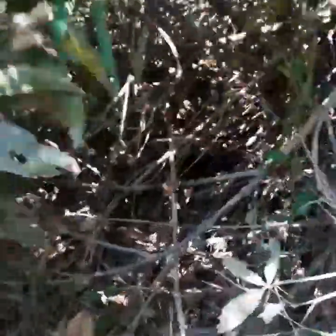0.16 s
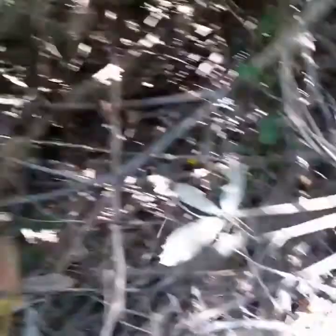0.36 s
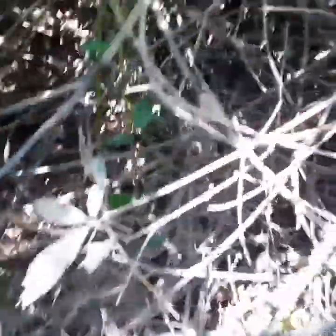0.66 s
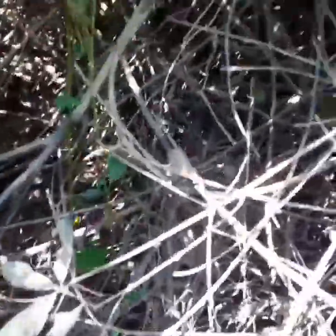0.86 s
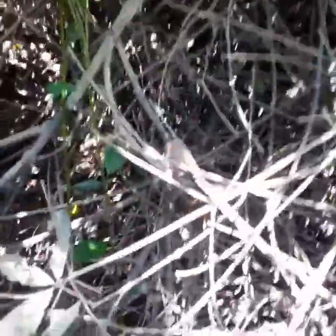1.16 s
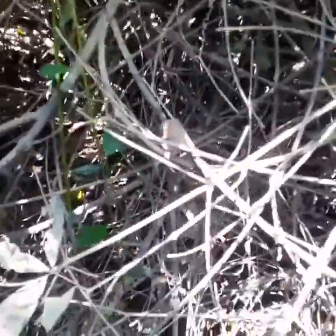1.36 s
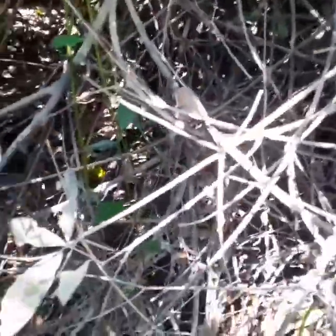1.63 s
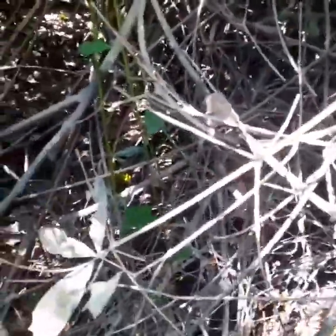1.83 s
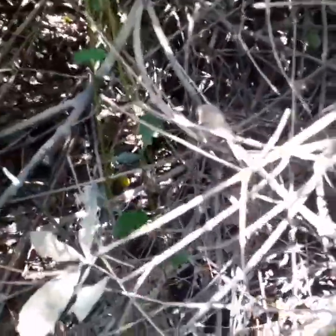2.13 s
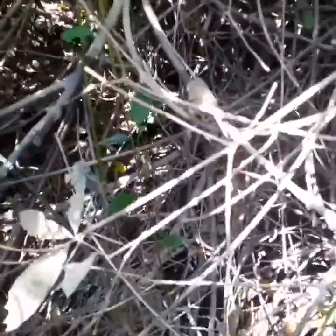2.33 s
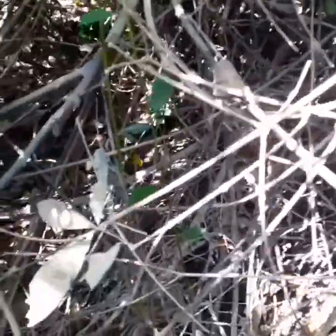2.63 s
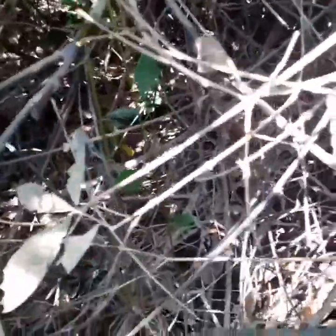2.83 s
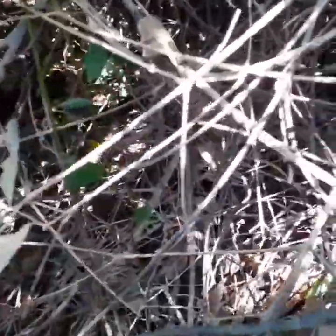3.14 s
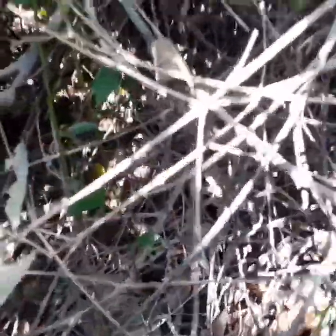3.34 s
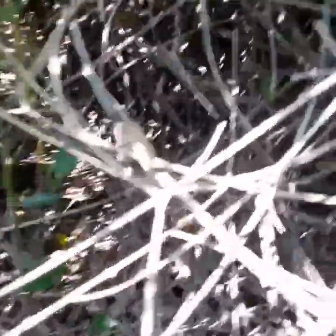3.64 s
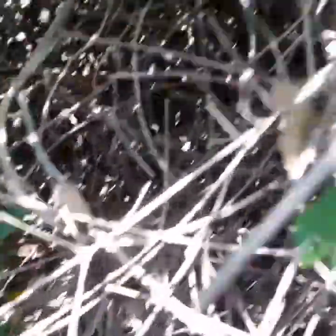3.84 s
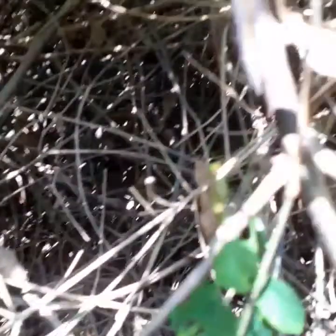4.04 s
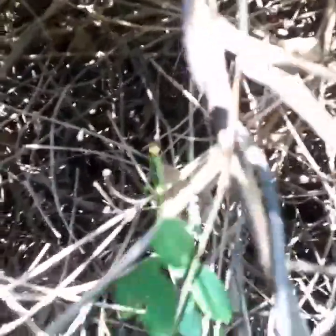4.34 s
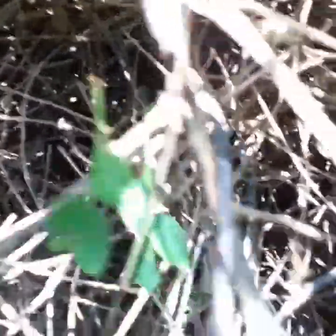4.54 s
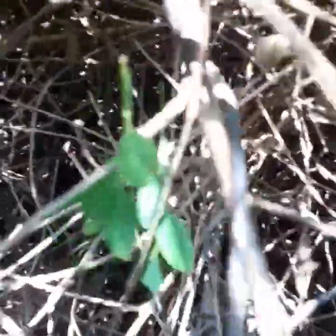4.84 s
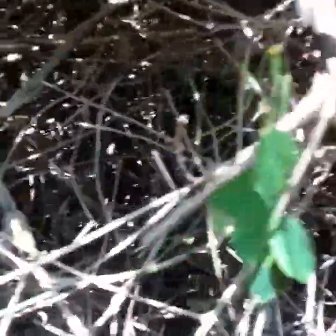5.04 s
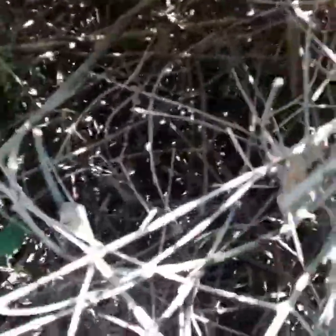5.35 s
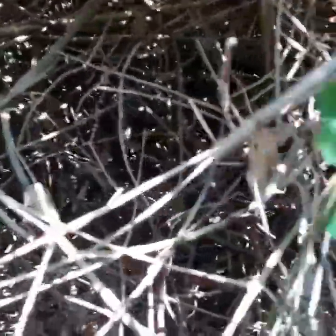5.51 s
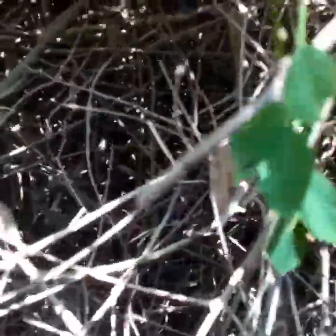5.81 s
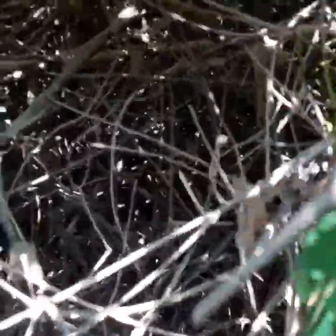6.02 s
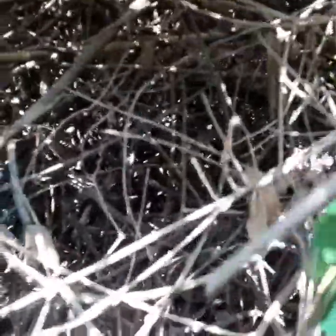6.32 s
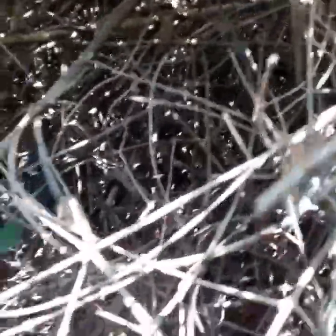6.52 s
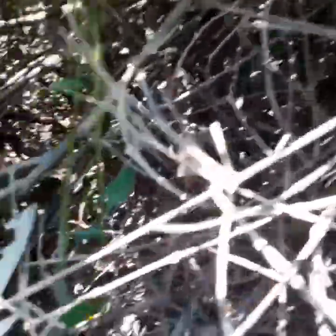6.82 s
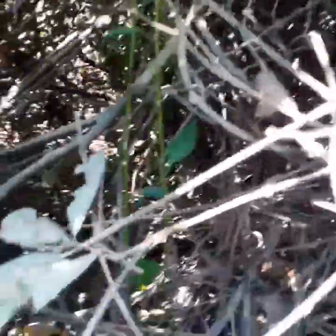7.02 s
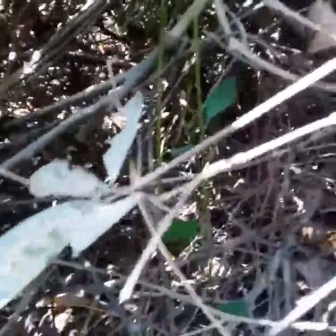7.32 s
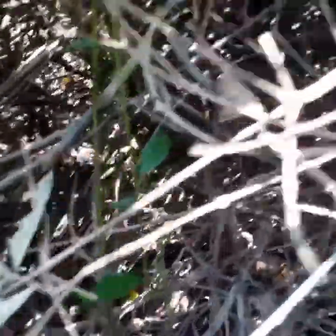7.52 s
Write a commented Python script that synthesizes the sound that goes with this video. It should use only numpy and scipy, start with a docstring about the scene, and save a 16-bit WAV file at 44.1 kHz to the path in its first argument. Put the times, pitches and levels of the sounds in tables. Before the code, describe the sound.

Close in a dry thicket, a hand pushes through dead leaves and twigs beside a handheld phone. Crisp, papery crackling starts at once with a bright snap near 0.1 s, swelling to a cluster of hard cracks and a brief rubbing creak at about 0.55 s, over a soft grip rumble. Snaps follow rapidly until 1.3 s, mostly toward the right. From 1.4 s the rustle drops to small ticks and light brushes, broken by a strong snap at 2.2 s and another at 3.2 s. A sharp crack at 3.5 s begins a second, fuller rustle lasting until about 4.5 s, with dull woody knocks near 4.25 and 4.7 s. Afterwards sparse, softer strokes come and go, with a knock and snap at 6.1 s and a weak last one near 7.6 s. Faint outdoor air stays behind; tiny distant bird notes touch 5.8, 6.6 and 7.2 s.

```python
"""Dead leaves crackle and twigs snap at once, close to a phone held by the twigs, as a hand pushes through.
Leaves are swarms of random clicks, snaps are short noise bursts with a ring, dragged stems are coloured noise.
Rubbed stems, and one snapping twig's ring, are noise through one resonance; a thicker branch knocks now and
then in damped sine modes. The thicket scatters every crack as decaying noise; the shifting grip rumbles softly.
Behind lie faint outdoor air, made of low noise with hiss, and a distant bird in gliding sine notes."""
import sys
import numpy as np
from scipy import signal
from scipy.fft import rfft, irfft
from scipy.io import wavfile

SR = 44100
rng = np.random.default_rng(int(sys.argv[2]) if len(sys.argv) > 2 else 0)


def store_wav(level_fs):
    """Save 16-bit WAV to argv[1]."""
    pcm = np.round(np.clip(np.atleast_2d(level_fs), -1, 1) * 32767)
    wavfile.write(sys.argv[1], SR, pcm.T.astype(np.int16))


N = 338351
TIME = np.arange(N) / SR

# faint outdoor air, spectrum before levelling: (f/Hz, density/dB per Hz)
AIR_SPECTRUM = [(20, -12), (40, -6.5), (60, 3.5), (95, -4), (160, 0), (260, -5.5), (420, -14),
                (1000, -25.5), (2200, -18.5), (4000, -28.5), (11000, -19)]
# distant bird notes, level before the echo mix and panning:
# (t/s, length/s, start f/Hz, end f/Hz, waver as a share of pitch, level/dB)
BIRD_NOTES = [(5.814, 0.017, 2500, 2300, .04, -53), (5.93, 0.041, 2620, 2310, 0.043, -49.5),
              (6.588, 0.049, 2860, 2080, 0.035, -54.5), (7.214, 0.19, 5380, 5800, 0.044, -57.5)]
# the phone shifts in the hand: (middle t/s, length/s, level/dB)
GRIP_SHIFTS = [(0.53, 0.38, -59.5), (2.275, 0.13, -64.5), (4.82, 0.22, -66), (7.297, 0.63, -75)]
# stems dragging over each other, spectrum before levelling: (f/Hz, density/dB per Hz)
STEM_SPECTRUM = [(40, -2), (100, -5), (250, -3.5), (370, -1.5), (480, 0), (750, -0.5), (1100, -0.5),
                 (1800, -5), (4000, -40.5)]
# a rubbed stem, or at 0.549 s the ring of a snapping twig, sounds one resonance;
# level before the fade in and out: (middle t/s, length/s, f/Hz, level/dB)
RESONANCES = [(0.474, 0.11, 365, -51), (0.515, 0.035, 700, -41), (0.55, 0.019, 690, -37),
              (0.549, 0.00992, 2160, -27.5), (0.578, .03, 643, -40), (4.267, 0.038, 404, -53),
              (4.749, 0.044, 5400, -49), (4.761, 0.063, 353, -56), (6.104, 0.042, 1700, -49),
              (6.46, 0.019, 930, -53), (7.594, 0.024, 1390, -56)]
# blows on a thicker branch, relative strength: (t/s, level/dB)
BRANCH_BLOWS = [(0.5731, -58), (4.253, -40.5), (4.7081, -43.5), (6.0806, -46), (7.574, -58.5)]
# bending modes of that branch: (f/Hz, relative level/dB, t60/s)
BRANCH_MODES = [(275, -1, 0.08), (374, -2.5, 0.13), (550, -17, 0.036), (704, -4, 0.05), (972, -2, 0.059),
                (1474, 8.5, 0.033), (1720, -3, 0.022)]
# twig snaps close by:
# (t/s, level/dB, brightness as top over middle band/dB, left minus right/dB, twig ring f/Hz)
TWIG_SNAPS = [(0.0614, -23.5, 8.5, 1, 2510), (0.183, -35.5, 1, -1, 2110), (0.515, -33, -4, -4, 1900),
              (0.5463, -23, 9.5, -5, 2200), (0.5729, -21.5, 2, -3.5, 2300), (0.5791, -33, 7, -0.5, 2000),
              (0.7504, -36.5, -2, -4, 2480), (0.7712, -36, -4, -4, 2260), (0.8305, -35, 0.5, -10, 2380),
              (0.8636, -34, 1, -9, 2540), (0.9188, -37, 4, -10, 2240), (0.938, -28, 3.5, -14, 2130),
              (0.954, -33.5, 0, -6, 2330), (0.9978, -38, -4, -5.5, 2090), (1.0005, -26.5, -5, -4, 2470),
              (1.0481, -32, 3, -4.5, 2520), (1.0975, -46, -16, -5.5, 2150), (1.1429, -41.5, -4, -0.5, 2500),
              (1.3025, -30, -1.5, -4.5, 2780), (1.317, -43, 21, -13, 4930), (1.5448, -52.5, 16, -1, 4590),
              (1.5957, -46, 10, 4, 2500), (1.6852, -47, 18, -5.5, 2200), (1.721, -46.5, 5, 2, 2100),
              (1.9705, -53, 7, -17, 2820), (2.055, -41.5, 29, 11, 2100), (2.0689, -37.5, 32, 16, 2100),
              (2.1013, -41, 14, 6, 2430), (2.155, -49, 18, -7, 3830), (2.198, -22, -2.5, -9, 3100),
              (2.247, -31.5, 5, -1, 2440), (2.3042, -44.5, 1, -11, 4400), (2.329, -47.5, 7, 2, 4540),
              (2.398, -50, -12, -2.5, 4080), (2.76, -44.5, 21, 5, 4960), (2.7997, -36, 22, 4, 3370),
              (3.092, -49.5, 21, 2, 4930), (3.194, -29, 16, -9, 2300), (3.4575, -36, -21, -7, 2080),
              (3.4858, -32.5, 8, -19, 4660), (3.495, -23, 5.5, -5.5, 1840), (3.8408, -34, 0, -1, 2800),
              (3.845, -35, -7, -1.5, 2970), (3.916, -37, 6, -0.5, 2370), (4.015, -36.5, -10, -8, 2500),
              (4.2514, -30, -17, 7, 1610), (4.2731, -40, -16, -1, 2480), (4.7073, -44, -15, 3.5, 1700),
              (4.845, -49.5, -10, -2.5, 2940), (4.862, -44.5, 23, 6, 3960), (5.1028, -43, -4, -16, 3050),
              (5.1665, -34, 1.5, -5.5, 2540), (5.2115, -47, 6, 0, 4890), (5.2244, -44, 13, -2, 4800),
              (5.3632, -43.5, -10, -11, 2980), (5.615, -39.5, 0, 0, 3650), (5.728, -47, 14, 0.5, 3700),
              (6.0831, -28.5, -4.5, -7, 3720), (6.176, -46, 13, -7, 4400), (6.2059, -47.5, 9, -5.5, 4670),
              (6.385, -48, 5, -1, 4630), (6.572, -50.5, -3, -4.5, 2900), (6.8096, -46.5, 14, 0.5, 4900),
              (6.886, -46.5, 6, -0.5, 4800), (7.3889, -42, 2, 0.5, 3700), (7.3998, -45.5, 9, 4, 4740),
              (7.5733, -49, 3, -4.5, 3550)]
# low, middle, upper and top band of a snap: (lower f/Hz, upper f/Hz)
SNAP_RANGES = [(250, 1200), (1200, 3200), (3200, 7000), (7000, 11800)]
# dry leaves, spectrum before crispness and levelling: (f/Hz, density/dB per Hz)
LEAF_SPECTRUM = [(300, -28.5), (800, -10), (1200, -11), (1650, -3), (2190, -1.5), (3260, -4), (4600, 0),
                 (7000, -3.5), (8500, -1.5), (9900, 3), (11000, -2.5), (12000, -20.5)]
# how much louder the left port hears the rustle: (f/Hz, left minus right/dB)
LEFT_OVER_RIGHT = [(300, 1), (1100, -1), (2050, -9), (3700, -5), (6600, -1.5), (11500, 1)]
# strokes of the hand through the twigs, levels at the start before easing and the rustle's trims:
# (start t/s, length/s, leaf rustle level/dB, scrape of stems relative to the leaves/dB)
HAND_STROKES = [(-0.02, .69, -43, -13.5), (0.096, 0.22, -44, -9.5), (0.349, 0.26, -39.5, -13.5),
                (0.473, .1, -36, -20), (0.692, 0.31, -43, -21), (0.925, 0.11, -46, -14.5),
                (1.038, 0.29, -47, -16), (1.155, 0.12, -44.5, -16), (1.343, 0.33, -57, -17),
                (1.622, .13, -53.5, -16.5), (1.836, 0.17, -61, -11.5), (2.02, .44, -53, -18),
                (2.148, .11, -58, -3), (2.519, 0.14, -52, -23), (2.677, 0.15, -52, -15),
                (2.873, 0.025, -48, -21), (3.074, 0.24, -59.5, -19), (3.272, 0.33, -52.5, -17),
                (3.378, 0.041, -52, -6.5), (3.429, 0.36, -42.5, -16.5), (3.812, 0.24, -46, -13.5),
                (4.066, 0.26, -43.5, -12.5), (4.328, 0.24, -46.5, -12.5), (4.58, 0.21, -51.5, -18),
                (4.707, 0.044, -50, -9), (4.808, 0.52, -53.5, -17), (5.149, 0.057, -48.5, -18),
                (5.299, 0.26, -52, -16.5), (5.54, 0.2, -50.5, -16), (5.808, .04, -49, -25),
                (5.878, 0.075, -59.5, -11), (6.021, 0.29, -54, -14), (6.353, 0.074, -53.5, -12.5),
                (6.602, 0.32, -62, -16), (6.88, 0.13, -51.5, -22), (7.037, 0.17, -54, -16),
                (7.218, 0.2, -55.5, -18.5), (7.56, 0.037, -54.5, -16)]

# microphone: longest delay between its two ports, and the edge of its top
PORT_LAG_S, TOP_HZ = 0.00044, 11450
# each stroke takes hold, eases off as the twigs give way, and the leaves settle after it
GRIP_S, EASE_DB_PER_S, SETTLE_DB_PER_S = 0.027, 5.5, 164
# the thicket stirs faintly between strokes
REST_LEAF_DB, REST_STEM_DB = -62, -78
# crispness is top over middle; brittle dead leaves come first, softer ones further on
START_CRISP_DB, SOFTEN_DB_PER_S = 0, 0.6
# a thinner twig than usual rings higher and cracks with more upper band; a thicker one adds body
USUAL_RING_HZ = 2150
UPPER_DB, UPPER_DB_PER_OCTAVE, UPPER_SHARE_OF_BRIGHTNESS = -6.5, 12.5, 0.25
BODY_DB, BODY_DB_PER_OCTAVE = -20, 52


def undb(db):
    """Decibels to gain."""
    return 10 ** (np.asarray(db) / 20)


def unit(x):
    """Scale to rms 1."""
    return x / np.sqrt(np.mean(x ** 2) + 1e-20)


def pan(left_over_right_db):
    """Gains of the left and right port for a level difference in dB."""
    return undb([[left_over_right_db / 2], [-left_over_right_db / 2]])


def add(out, s, sound):
    """Mix a stereo sound in at time s."""
    start = max(int(s * SR), 0)
    out[:, start:start + sound.shape[1]] += sound[:, :N - start]


def band(x, lo_hz, hi_hz, order=3):
    """Causal band-pass."""
    edges = [lo_hz, min(hi_hz, 0.48 * SR)]
    return signal.sosfilt(signal.butter(order, edges, "band", fs=SR, output="sos"), x)


def colour(x, points, size=2048):
    """Causal minimum-phase filter through (f/Hz, level/dB) points, built from the cepstrum."""
    hz, db = np.transpose(points)
    grid = np.maximum(np.arange(size // 2 + 1) * SR / size, 1)
    level_db = np.interp(np.log(grid), np.log(hz), db)
    cepstrum = irfft(np.log(undb(level_db)))
    # folding the cepstrum onto positive time makes the filter causal
    cepstrum[1:size // 2] *= 2
    cepstrum[size // 2 + 1:] = 0
    response = irfft(np.exp(rfft(cepstrum)))
    return signal.oaconvolve(x, response[None], axes=1)[:, :x.shape[1]]


def walk(rate):
    """Random wander with a spread near 1, through `rate` random knots a second."""
    knots = rng.standard_normal(2048)
    return np.interp(TIME * rate, np.arange(len(knots)), knots)


def pair(shared, pan_db, size=N):
    """Stereo noise with a share of its power common to both ports."""
    common, *own = rng.standard_normal((3, size))
    shared = np.clip(shared, 0, 1)
    ports = np.sqrt(shared) * common + np.sqrt(1 - shared) * np.array(own)
    return ports * pan(pan_db)


def air():
    """Low outdoor rumble with a faint hiss, as coloured noise whose level wanders."""
    noise = unit(colour(pair(shared=0.95, pan_db=-0.5), AIR_SPECTRUM))
    return noise * undb(-69.0 + 3.9 * walk(rate=6.5))


def woods(x, t60, size=22050):
    """Diffuse echoes from surrounding bushes and trunks: noise that dies 60 dB in t60 seconds."""
    t = np.arange(size) / SR
    noise = band(rng.standard_normal((2, size)), 180, 5000, order=1)
    tail = noise * undb(-60 * t / t60) * (1 - np.exp(-t / 0.0021))
    return signal.oaconvolve(x, unit(tail) / np.sqrt(size), axes=1)[:, :N]


def bird():
    """Short wavering sine notes from far off to the right, with echoes."""
    out = np.zeros((2, N))
    for s, length, start_hz, end_hz, waver, db in BIRD_NOTES:
        size = int(length * SR)
        glide_hz = np.linspace(start_hz, end_hz, size)
        hz = glide_hz * (1 + waver * walk(rate=1100)[:size])
        note = np.sin(2 * np.pi * np.cumsum(hz) / SR) * np.sqrt(np.hanning(size))
        add(out, s, undb(db) * note * undb([[-4.0], [2.5]]))
    return 0.86 * out + 0.48 * woods(out, t60=0.22)


def handling(lo_hz=50, hi_hz=260):
    """Dull noise rumble that swells and fades as the grip on the phone shifts."""
    swells = np.zeros(N)
    for s, length, db in GRIP_SHIFTS:
        swells += undb(db) * np.exp(-(2 * (TIME - s) / length) ** 2)
    rumble = band(pair(shared=0.88, pan_db=-4.0), lo_hz, hi_hz, order=2)
    return unit(rumble) * swells


def stems(level_db):
    """Stems drag over each other in small dull slips, as noise of fluttering level."""
    slips = pair(shared=0.56, pan_db=-0.5) * undb(3.2 * walk(rate=61))
    return unit(colour(slips, STEM_SPECTRUM)) * undb(level_db)


def resonances(width=0.029):
    """Noise drives one damped resonance: a stem in stick and slip, or at 0.549 s a snapping twig's ring."""
    out = np.zeros((2, N))
    for s, length, hz, db in RESONANCES:
        size = int(length * SR)
        drive = pair(shared=0.22, pan_db=-8.5, size=16384)
        # keep the end, where the resonance has built up
        ring = band(drive, hz * (1 - width), hz * (1 + width), order=1)[:, -size:]
        add(out, s - length / 2, unit(ring) * np.hanning(size) * undb(db))
    return out


def knocks(size=8192):
    """A struck branch rings in its damped bending modes, a little differently at each blow."""
    out = np.zeros((2, N))
    t = np.arange(size) / SR
    hz, mode_db, t60 = np.transpose(BRANCH_MODES)[:, :, None]
    for s, db in BRANCH_BLOWS:
        detune, left, right = rng.standard_normal((3, len(BRANCH_MODES), 1))
        tones = np.sin(2 * np.pi * hz * (1 + 0.016 * detune) * t)
        modes = undb(mode_db) * tones * undb(-60 * t / t60)
        ports = [(modes * undb(2.0 * port)).sum(0) for port in (left, right)]
        add(out, s, undb(db - 8.0) * np.array(ports))
    return out


def crack(side, break_s, scatter_s, scatter_db, size=2048):
    """Fibres break in a burst, nearer port first (side -1 right, 1 left); twigs and hand scatter it."""
    t = np.arange(size) / SR
    # one fibre sets off the next, so the burst takes a moment to peak
    burst = unit(rng.standard_normal(size) * np.sqrt(t) * np.exp(-t / break_s))
    scatter_shape = np.exp(-t / scatter_s) * (1 - np.exp(-t / (2 * break_s)))
    scatter = unit(rng.standard_normal((2, size)) * scatter_shape)
    heard = burst + undb(scatter_db) * scatter
    lags = (np.clip([-side, side], 0, 1) * PORT_LAG_S * SR).astype(int)
    return np.array([np.pad(port, (lag, 0))[:size] for port, lag in zip(heard, lags)])


def twig_colour(bright_db, ring_hz):
    """Gains of a snap's low, middle, upper and top band, from the twig's thickness and brightness."""
    thin_octaves = np.log2(ring_hz / USUAL_RING_HZ)
    low_db = BODY_DB + BODY_DB_PER_OCTAVE * max(-thin_octaves, 0)
    upper_db = UPPER_DB + UPPER_DB_PER_OCTAVE * thin_octaves + UPPER_SHARE_OF_BRIGHTNESS * bright_db
    return undb([low_db, 0, upper_db, bright_db])


def snaps(ring_width=0.18):
    """A twig breaks: a sub-millisecond crack whose colour and ring depend on its thickness."""
    out = np.zeros((2, N))
    attack = int(0.006 * SR)  # levels are set over the first 6 ms
    for s, db, bright_db, pan_db, ring_hz in TWIG_SNAPS:
        side = np.clip(pan_db / 4, -1, 1)
        sound = crack(side, break_s=0.00038, scatter_s=0.003, scatter_db=-1.0)
        # dry wood rings for a few milliseconds
        ring = band(sound, ring_hz * (1 - ring_width), ring_hz * (1 + ring_width), order=1)
        sound = sound + 1.94 * ring
        gains = twig_colour(bright_db, ring_hz)
        coloured = np.zeros_like(sound)
        for k, (lo_hz, hi_hz) in enumerate(SNAP_RANGES):
            part = band(sound, lo_hz, hi_hz, order=2)
            part_rms = np.sqrt(np.mean(part[:, :attack] ** 2))
            # neighbouring bands meet in opposite phase, so their signs alternate
            coloured += (-1) ** k * gains[k] * part / part_rms
        port_rms = np.sqrt(np.mean(coloured[:, :attack] ** 2, axis=1, keepdims=True))
        add(out, s, coloured / port_rms * undb(db) * unit(pan(pan_db)))
    return out


def swarm(rate, spread_db):
    """Random clicks, `rate` a second, many small and a few large, at rms 1."""
    count = int(max(rate, 1) * N / SR)
    place, size, sign = rng.random((8000, 3))[:count].T
    sizes = undb(spread_db * np.minimum(-np.log(size + 1e-9), 3.5))
    return unit(np.bincount((place * N).astype(int), sizes * np.sign(sign - 0.5), N))


def leaves(level_db, crisp_db, rate, spread_db, scatter_s, count):
    """Each dry leaf crackles in fits of clicks, with its own place and its own papery colour."""
    out = np.zeros((2, N))
    for side in np.linspace(-1.3, 1.0, count):
        response = crack(side, break_s=0.00025, scatter_s=scatter_s, scatter_db=0.0)
        own_colour = np.column_stack([np.geomspace(1000, 12000, 7), 2.5 * rng.standard_normal(7)])
        clicks = swarm(rate, spread_db) * undb(2.56 * walk(rate=32))
        out += signal.oaconvolve(clicks[None], unit(colour(response, own_colour)), axes=1)[:, :N]
    out = colour(out, LEAF_SPECTRUM)
    # thin brittle leaves add top, soft brushing takes it away
    top = signal.sosfiltfilt(signal.butter(2, 6500, "high", fs=SR, output="sos"), out)
    crisp = undb(crisp_db)
    out = unit(out - top) + unit(top) * crisp
    # hold the loudness steady as the crispness changes
    return unit(out / np.hypot(1, crisp)) * undb(level_db)


def hand():
    """Leaf and stem levels in dB: strokes rise, ease off and die away, and overlaps add in power."""
    leaf, stem = undb(REST_LEAF_DB) ** 2, undb(REST_STEM_DB) ** 2
    for start, length, db, scrape_db in HAND_STROKES:
        age = np.maximum(TIME - start, 0)
        ease_db = EASE_DB_PER_S * np.minimum(age, length)
        settle_db = SETTLE_DB_PER_S * np.maximum(age - length, 0)
        rise = np.minimum(age / GRIP_S, 1)
        power = (rise * undb(db - ease_db - settle_db)) ** 2
        leaf = leaf + power
        stem = stem + power * undb(scrape_db) ** 2
    return 10 * np.log10(leaf), 10 * np.log10(stem)


def scene():
    """The thicket close by, the bird and the air behind it."""
    leaf_db, stem_db = hand()
    # bent twigs catch and let go, so the whole rustle flutters a little
    leaf_db = leaf_db + 1.1 * walk(rate=28)
    crisp_db = START_CRISP_DB - SOFTEN_DB_PER_S * TIME
    sliding = leaves(leaf_db - 1.04, crisp_db, rate=125, spread_db=3.3, scatter_s=0.0051, count=26)
    # lone, sharper ticks come as bent leaves spring back and the smallest twigs break
    tick_db = -60 + 0.87 * (leaf_db - np.mean(leaf_db))
    settling = leaves(tick_db, crisp_db, rate=6, spread_db=3.8, scatter_s=0.003, count=12)
    rustle = sliding + settling + stems(stem_db)
    left = colour(rustle[[0]], [(hz, db / 2) for hz, db in LEFT_OVER_RIGHT])
    right = colour(rustle[[1]], [(hz, -db / 2) for hz, db in LEFT_OVER_RIGHT])
    near = np.vstack([left, right]) + snaps() + knocks() + resonances() + handling()
    return near + undb(-20) * woods(near, t60=0.086) + bird() + air()


def record(dry):
    """The phone's microphone drops the deepest bass and cuts the top steeply."""
    dry = signal.sosfilt(signal.butter(3, 48, "high", fs=SR, output="sos"), dry)
    return signal.sosfilt(signal.ellip(8, 0.3, 65, TOP_HZ, fs=SR, output="sos"), dry)


dry = scene()
out = record(dry)
store_wav(out)
```